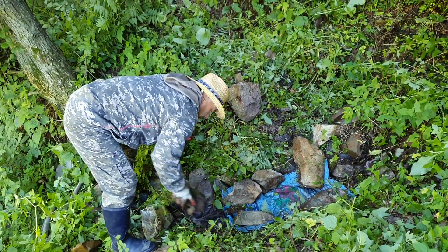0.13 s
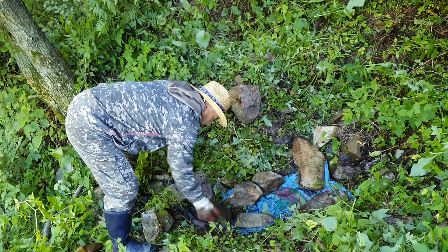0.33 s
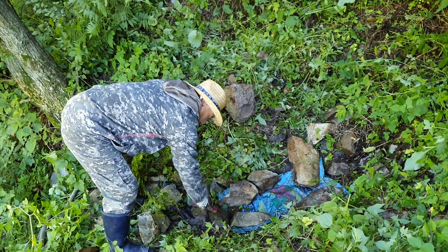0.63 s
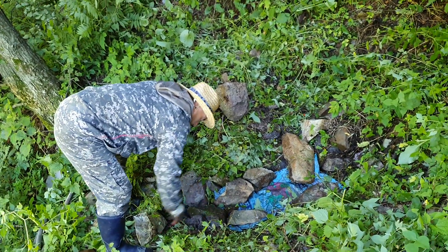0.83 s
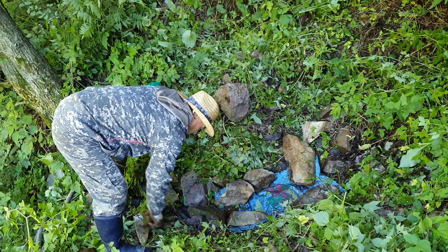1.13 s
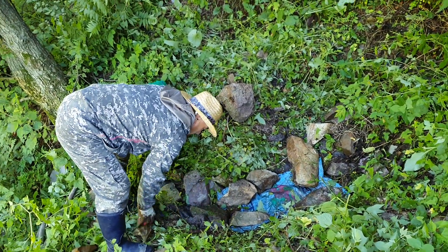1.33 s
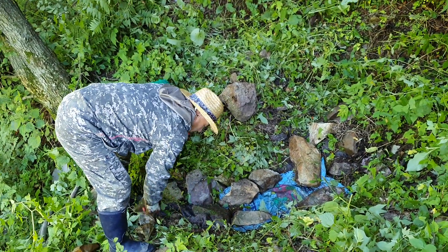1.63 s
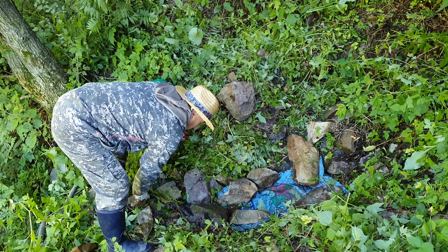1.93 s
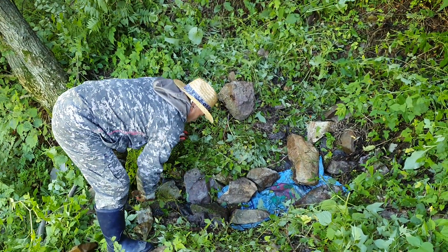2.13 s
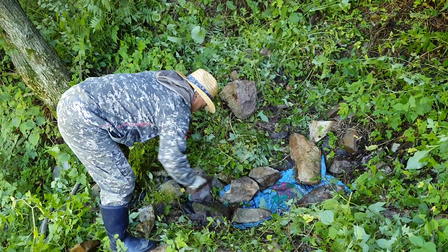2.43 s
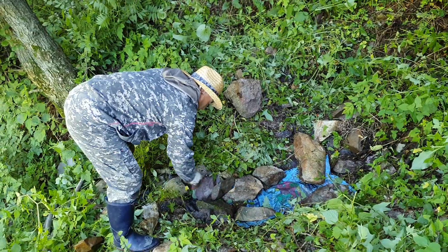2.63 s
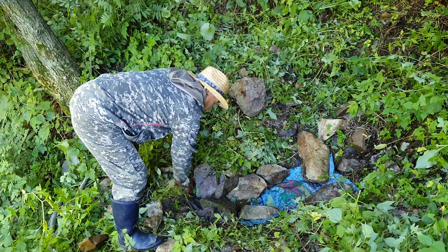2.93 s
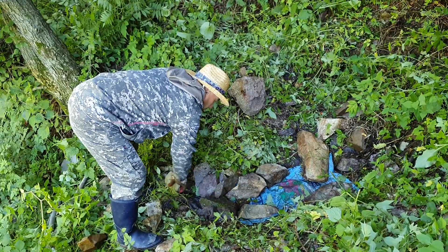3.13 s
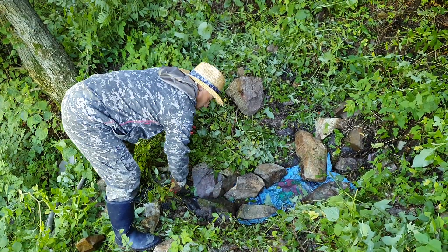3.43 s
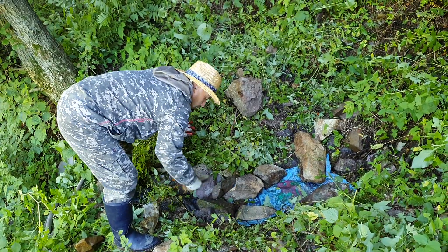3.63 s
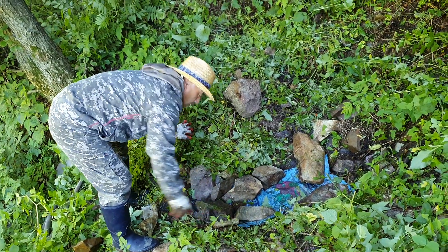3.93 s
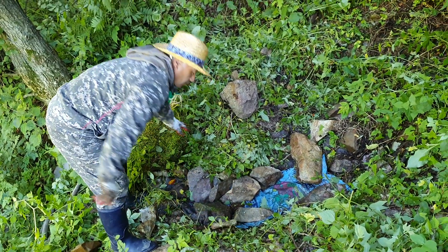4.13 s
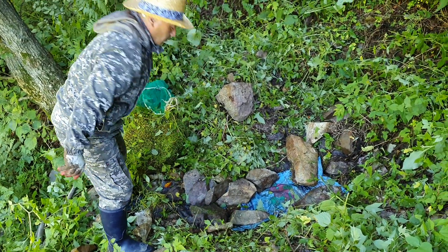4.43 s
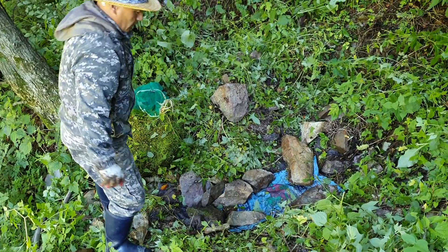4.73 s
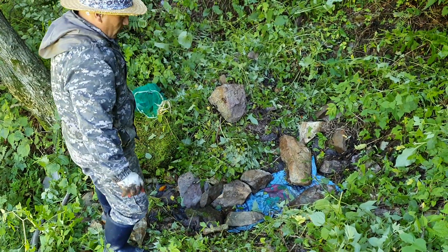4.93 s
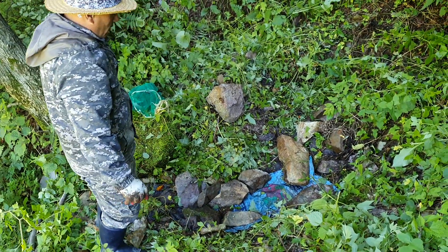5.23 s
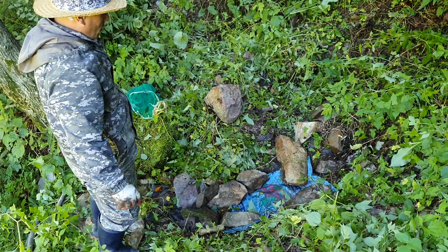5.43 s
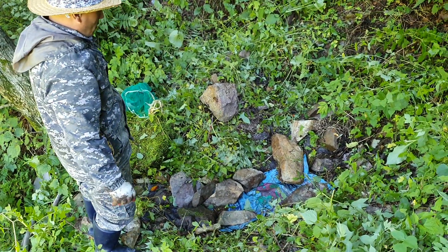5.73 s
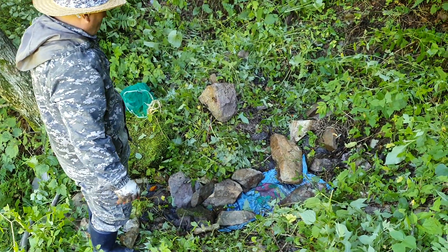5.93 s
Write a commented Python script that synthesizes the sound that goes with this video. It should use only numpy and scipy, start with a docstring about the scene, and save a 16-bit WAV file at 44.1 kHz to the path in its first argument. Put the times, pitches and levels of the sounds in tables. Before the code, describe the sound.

Someone lays stones by hand outdoors, heard from fairly close: first a short gritty scrape and knock, then light taps, one sharp, slightly distorted crack, and a duller double knock with a thud. The rest is soft rustling of leaves and clothes with a few faint bumps. Thin, high bird chirps and a faint distant engine sit in a low hush throughout.

```python
"""Over an outdoor hush, a stone grinds into place in a low ring being laid by hand on an overgrown slope.
Another cracks hard against its neighbour and overloads the right channel; a third lands with a double
knock. Contacts click and ring, crushed grit crackles, the soil thuds, and the slope echoes briefly.
Leaves and clothing rustle, small birds chirp in the trees, and a far engine hums."""
import sys
import numpy as np
from scipy import signal
from scipy.fft import rfft, irfft, next_fast_len
from scipy.io import wavfile

SR = 44100
rng = np.random.default_rng(int(sys.argv[2]) if len(sys.argv) > 2 else 0)


def transcribe(u):
    """Save the signal u as a 16-bit wav file named by the first command-line argument.

    u: samples, shape (n,) or (channels, n), limited to [-1, 1]; the rate is SR.
    q: integer samples, one column per channel.
    """
    v = np.clip(np.atleast_2d(u).T, -1, 1)
    q = np.round(v * 32767).astype(np.int16)
    wavfile.write(sys.argv[1], SR, q)


N = 268789
T = np.arange(N) / SR


def undb(db):
    """Decibels to gain."""
    return 10 ** (np.asarray(db) / 20)


def unit(x):
    """Scale to rms 1."""
    return x / np.sqrt(np.mean(x ** 2))


def colour(x, points):
    """Filter by a (Hz, dB) curve."""
    hz, db = np.transpose(points)
    size = next_fast_len(x.shape[-1], real=True)
    bins_hz = np.fft.rfftfreq(size, 1 / SR)
    gain = undb(np.interp(np.log(bins_hz + 1), np.log(hz), db))
    return irfft(rfft(x, size) * gain, size)[..., :x.shape[-1]]


def drift(per_s):
    """Random drift of rms 1, with per_s new values a second."""
    levels = rng.standard_normal(N // 10)
    return unit(np.interp(T * per_s, np.arange(len(levels)), levels))


def add(track, start_s, sound):
    """Mix a sound into the track."""
    i = max(int(start_s * SR), 0)
    track[i:i + len(sound)] += sound[:max(N - i, 0)]


def pan(x, left_db):
    """Place in stereo; left_db is left minus right."""
    return x * undb(np.array([[left_db], [-left_db]]) / 2)


def grains(per_s, spread_db):
    """A stream of tiny fractures of unequal size."""
    size = undb(spread_db * np.minimum(rng.exponential(size=N), 4))
    return unit((rng.random(N) < per_s / SR) * rng.choice([-1, 1], N) * size)


def scatter(x, delay_s, t60_s, points):
    """Diffuse echo from ground and plants: late onset, then decay, unrelated left and right."""
    t = T[:SR]
    envelope = (1 - np.exp(-(t / delay_s) ** 6)) * undb(-60 * t / t60_s)
    echo = colour(rng.standard_normal((2, SR)), points) * envelope / np.sqrt(np.sum(envelope ** 2))
    return signal.fftconvolve(x[None], echo, axes=1)[:, :N]


# Each row: frequency in Hz, relative noise density in dB.
HUSH_SPECTRUM = [(15, -40), (25, -9), (69, -7), (82, -10), (99, -21.5), (240, -10), (359, -15), (552, -13),
                 (762, -21.5), (1450, -25), (1950, -22), (2850, -29.5), (6050, -34.5), (8810, -50.5),
                 (15500, -47.5)]
# Each row: frequency in Hz, left minus right in dB.
HUSH_BALANCE = [(60, -2), (200, -1.5), (700, -.5), (2400, 3.5), (4400, 0.5), (8000, 14), (15000, -9)]
# Each row: time in seconds, level in dB. The rumble follows 0.7 of the swing about the mean.
RUMBLE_CONTOUR = [(0.0, -62), (0.25, -61), (4.14, -61.5), (5.22, -54), (5.44, -60), (6.09, -60)]

def hush():
    """Distant outdoor noise, narrow in the bass, wide in the treble; its rumble swells and ebbs."""
    mid, side = colour(rng.standard_normal((2, N)), HUSH_SPECTRUM)
    side = colour(side, [(60, -15), (200, -10), (380, -7), (700, 0.5),
                         (1300, 4.5), (2400, -2.5), (8000, 4.5)])
    left = colour(mid + side, [(hz, db / 2) for hz, db in HUSH_BALANCE])
    right = colour(mid - side, [(hz, -db / 2) for hz, db in HUSH_BALANCE])
    air = np.array([left, right]) / np.std(mid)
    rumble = colour(air, [(700, -10), (2500, -22)])
    contour_db = np.interp(T, *np.transpose(RUMBLE_CONTOUR))
    swell_db = 0.7 * (contour_db - contour_db.mean()) + 0.75 * drift(per_s=7.5)
    return undb(-57) * (air - rumble + rumble * undb(swell_db))


# Each row: peak time in seconds, half width in seconds, rise in dB.
ENGINE_SWELLS = [(2.42, 0.43, 12), (4.45, .25, 7.5), (5.3, .17, 9)]

def engine():
    """A far engine: one low, wavering tone that swells and recedes."""
    hz = 68.1 + 2.59 * drift(per_s=22)
    swell_db = sum(rise_db * np.exp(-((T - peak_s) / width_s) ** 2 / 2)
                   for peak_s, width_s, rise_db in ENGINE_SWELLS)
    rms_db = -65.5 + swell_db + 2.5 * drift(per_s=12)
    tone = np.sqrt(2) * np.sin(2 * np.pi * np.cumsum(hz) / SR)
    return pan(tone * undb(rms_db), left_db=-2)


def whistle(length_s, top_hz, fall_hz, sag, overtone_db, quaver_hz):
    """A bird's note swells as its pitch sags and lifts; a random quaver, quaver_hz deep, roughens it."""
    progress = np.linspace(0, 1, int(length_s * SR))
    quaver = np.interp(progress, np.linspace(0, 1, 60), rng.standard_normal(60))
    hz = top_hz - fall_hz * np.interp(progress, *np.transpose(sag)) + quaver_hz * quaver
    phase = 2 * np.pi * np.cumsum(hz) / SR
    return np.sin(np.pi * progress ** 1.41) * (np.sin(phase) + undb(overtone_db) * np.sin(2 * phase))


# Pitch contours. Each row: share of the note, share of the fall.
CHIRP_SAG = [(0, 0.51), (.25, .01), (.45, 0), (.8, .95), (1, 0.13)]
SLUR_SAG = [(0, 0.059), (.25, .25), (.55, .8), (.75, 1), (1, .6)]
# Each row: start in seconds, top pitch in Hz, fall in Hz, relative level in dB.
CHIRPS = [ (.429, 5190, 80, -49.5), (.665, 5035, 61, -57), (1.448, 5080, 221, -53),
          (1.925, 4990, 88, -53.5), (2.228, 5200, 111, -48.5), (2.970, 5160, 128, -52),
          (3.440, 5030, 101, -56.5), (3.665, 5170, 151, -50.5), (4.441, 5186, 123, -51.5),
          (4.975, 5110, 99, -60), (5.168, 5160, 139, -50.5), (5.914, 5170, 220, -49.5), ]
# A farther bird. Each row: start in seconds, top pitch in Hz, relative level in dB, overtone in dB.
SLURS = [(2.135, 4120, -64, -7.5), (3.459, 4490, -74, -17)]
# Each row: start in seconds, top pitch in Hz, relative level in dB.
HOARSE_CALLS = [(1.05, 6220, -61), (3.62, 5750, -67), (4.317, 5550, -70), (5.855, 5600, -60)]

def birds():
    """Birds off to the left, each kind repeating one note, prolonged by the trees."""
    song = np.zeros(N)
    for start_s, top_hz, fall_hz, db in CHIRPS:
        note = whistle(0.1026, top_hz, fall_hz, CHIRP_SAG, overtone_db=-52, quaver_hz=18.6)
        add(song, start_s, undb(db) * note)
    for start_s, top_hz, db, overtone_db in SLURS:
        note = whistle(0.28, top_hz, fall_hz=260, sag=SLUR_SAG, overtone_db=overtone_db, quaver_hz=22)
        add(song, start_s, undb(db) * note)
    for start_s, top_hz, db in HOARSE_CALLS:
        note = whistle(0.062, top_hz, fall_hz=260, sag=CHIRP_SAG, overtone_db=-40, quaver_hz=268)
        add(song, start_s, undb(db) * note)
    song *= undb(2.5 * drift(per_s=60) - 3)
    trees = scatter(song, delay_s=0.0048, t60_s=0.64, points=[(3000, -1.2), (9000, -1.27)])
    return pan(song, left_db=13) + undb(2) * pan(trees, left_db=3.5)


# Leaves stirred by the worker or shaken by the hard crack.
# Each row: peak time in seconds, rise and fall time constant in seconds, relative level in dB.
LEAF_RUSTLES = [ (1.165, 0.034, -61), (1.33, 0.11, -59), (1.755, 0.077, -61), (2.305, 0.017, -56),
                (2.606, 0.02, -49.5), (3.48, 0.041, -59.5), (5.225, 0.089, -59.5), (5.38, .03, -58.5),
                (5.91, 0.035, -66.5), ]

def brushes(lag_s=0.012, width_s=0.065, shake_db=-24):
    """The rows of LEAF_RUSTLES, plus one for each sliding stone that brushes the leaves."""
    return LEAF_RUSTLES + [(start_s + lag_s, width_s, db + shake_db) for start_s, _, _, db, _ in SCRAPES]


def leaf_ticks():
    """Four leaves flick free in each brush, each with a tiny high ring of its own."""
    out, t = np.zeros(N), T[:SR // 50]
    for peak_s, width_s, db in brushes():
        for offset, pitch, force in rng.standard_normal((4, 3)):
            hz = np.clip(10500 * np.exp(0.3 * pitch), 4000, 15000)
            tick = np.exp(-t / 0.0007) * np.sin(2 * np.pi * hz * t)
            add(out, peak_s + offset * width_s, undb(db + 2 + 2 * force) * tick)
    return out


# Each row: frequency in Hz, gain in dB.
LEAF_SPECTRUM = [(800, -9), (2000, 6.5), (4000, -27), (7000, 5), (9000, -7.5), (12500, 1.5), (16000, -5)]
CLOTH_SPECTRUM = [(200, -8.5), (600, -9), (2000, 0.5), (3500, 2), (8000, -11.5)]

def rustle():
    """Leaves crackle and cloth rasps with each brush; the leaves stir faintly in between."""
    swell = np.sqrt(sum((undb(db) * np.exp(-abs(T - peak_s) / width_s)) ** 2
                        for peak_s, width_s, db in brushes()))
    crackle = np.array([grains(per_s=3000, spread_db=0.4) for _ in range(2)])
    leaves = unit(colour(crackle, LEAF_SPECTRUM)) * (swell + undb(-66.5))
    cloth = unit(colour(crackle, CLOTH_SPECTRUM)) * swell * undb(3)
    flicker = undb(1.9 * drift(per_s=90) - 4)
    return pan((leaves + cloth) * flicker + leaf_ticks(), left_db=0.9)


# Each row: start in seconds, relative level in dB, resting pitch in Hz.
THUDS = [ (.377, -30, 122), (1.267, -38, 154), (1.356, -44, 145), (1.404, -43.5, 150), (2.290, -40, 254),
         (2.474, -38.5, 244), (3.864, -28.5, 149), (3.881, -23.5, 62.4), (5.28, -40, 253),
         (5.386, -45, 124.5), ]

def thuds(attack_s=0.00077, yield_s=0.0055, octave_up_db=-31.5):
    """A stone bounces on springy soil; a hard landing stiffens it, and the pitch sinks as it yields."""
    out, t = np.zeros(N), T[:SR // 4]
    for start_s, db, rest_hz in THUDS:
        hz = rest_hz * (1 + undb(db - octave_up_db) * np.exp(-t / yield_s))
        t60_s = 0.091 * np.sqrt(100 / rest_hz)
        envelope = (1 - np.exp(-t / attack_s)) * undb(db - 60 * t / t60_s)
        add(out, start_s, envelope * np.sin(2 * np.pi * np.cumsum(hz) / SR))
    return colour(out, [(25, -18), (65, -3)])  # trim the deepest bass


# Per stone. Each row: frequency in Hz, level in dB, T60 in seconds.
STONE_MODES = { "rough": [(440, -32, 0.01), (850, -2.5, 0.035), (980, -7, 0.039), (1360, 6, 0.012),
               (1615, 5.5, 0.03), (1740, 1.5, 0.028), (1830, -9, 0.018), (2290, -2, 0.031),
               (2640, -4, 0.031)], "hard": [(646, -12, 0.021), (1020, -15.5, 0.023), (1152, -1.5, 0.028),
               (1644, -5.5, 0.027), (1940, 0, 0.022), (2660, 1.5, 0.011), (3080, 5.5, 0.0054),
               (3020, -22, 0.22), (3340, -18, 0.13)], "heavy": [(238, -11, 0.017), (362, -2.5, 0.02),
               (557, 3.5, 0.045), (686, -7, 0.039), (915, -0.5, 0.025), (1120, 12.5, 0.014),
               (1470, 3.5, 0.02), (2740, 5.5, 0.012), (5620, 0.5, 0.015)], "small": [(587, -1.5, 0.028),
               (797, -1, 0.029), (893, 0, 0.029), (1130, 0, 0.033)], }

def stone_ring(stone):
    """Impulse response of a stone's well damped modes."""
    t = T[:SR // 5]
    return sum(undb(db - 60 * t / t60_s) * np.cos(2 * np.pi * hz * t)
               for hz, db, t60_s in STONE_MODES[stone])


# Each row: start in seconds, stone, length in seconds, relative level in dB, crackle over ring in dB.
SCRAPES = [ (.333, "rough", 0.043, -34.5, -5.5), (1.284, "small", .05, -57.5, -20),
           (1.786, "small", 0.053, -60, -16), (2.301, "rough", 0.013, -54, -14),
           (2.5846, "hard", 0.015, -41.5, 7.5), (3.8605, "heavy", 0.028, -36.5, -6), ]

def scrapes():
    """Grit crushed between sliding stones crackles and keeps the stone ringing."""
    out, grit = np.zeros(N), grains(per_s=7000, spread_db=2.5)
    for start_s, stone, length_s, db, crackle_db in SCRAPES:
        crackle = unit(grit[int(start_s * SR):int((start_s + length_s) * SR)])
        ring = signal.fftconvolve(crackle, stone_ring(stone))
        ring *= np.sqrt(len(crackle) / np.sum(ring ** 2))  # same energy as the crackle
        add(out, start_s, undb(db) * ring)
        add(out, start_s, undb(db + crackle_db) * crackle)
    return colour(out, [(200, 7.5), (1500, -5.5), (4000, -1), (7000, -3),
                        (9500, -8.5), (12500, -4), (16000, -8.5)])


# Per stone: gain of the ring over the click in dB, at the reference contact time.
RING_DB = {"rough": -12.5, "hard": -6, "heavy": -5, "small": -14}
# Each row: time in seconds, stone, relative level in dB, contact time in milliseconds.
KNOCKS = [ (0.3457, "rough", -33, 0.054), (.3668, "rough", -24.5, 0.068), (0.3725, "small", -28, 0.35),
          (.4215, "small", -42, 0.31), (1.2589, "small", -31.5, 0.25), (1.4025, "small", -37.5, .19),
          (1.7935, "small", -42, 0.32), (2.5722, "hard", 2, 0.086), (2.6023, "hard", -23, 0.099),
          (2.6064, "small", -16, 0.18), (3.8651, "heavy", -25.5, 0.081), (3.8808, "heavy", -23, 0.034),
          (3.8820, "heavy", -27, 0.18), (5.3820, "small", -44.5, .19), (5.9560, "small", -42, 0.21), ]

def knocks(reference_ms=0.1):
    """Stone jolts stone: a one-cycle click and a brief ring; longer contact is duller and rings more."""
    out, lead = np.zeros(N), SR // 300
    t_ms = np.arange(-lead, lead) / SR * 1000
    for time_s, stone, db, contact_ms in KNOCKS:
        contact_phase = t_ms / contact_ms
        click = np.sin(contact_phase) * np.exp(-(contact_phase / 3.63) ** 2)
        force = np.exp(-contact_phase ** 2 / 2)
        force *= contact_ms / reference_ms / force.sum()
        ring = np.convolve(force, stone_ring(stone))
        add(out, time_s - lead / SR, undb(db) * click)
        add(out, time_s - lead / SR, undb(db + RING_DB[stone]) * ring)
    return out


# Echo off ground and slope. Each row: frequency in Hz, gain in dB.
ECHO_SPECTRUM = [(100, -11), (500, 5), (1200, 0), (3000, 8), (6000, 13.5), (15000, 10.5)]

def scene():
    """The stones, echoed by the ground and the slope behind, among birds, leaves and distant noise."""
    stones = knocks() + scrapes()
    ground = undb(-18.5) * scatter(stones, delay_s=0.0063, t60_s=0.13, points=ECHO_SPECTRUM)
    slope = undb(-33.5) * scatter(stones, delay_s=0.034, t60_s=0.27, points=ECHO_SPECTRUM)
    direct = pan(stones, left_db=1.05) + pan(thuds(), left_db=-2)
    return direct + ground + slope + birds() + rustle() + engine() + hush()


# Each row: frequency in Hz, gain in dB.
SNAP_SPECTRUM = [(1200, -27), (2200, 1), (4000, -7.5), (6000, 8.5), (8000, 2.5), (9700, 7), (12500, -8)]

def overload(x, ceiling):
    """Peaks near the ceiling fold back, adding odd overtones as a bright snap."""
    folded = x / (1 + (x / ceiling) ** 8)
    return x + colour(folded - x, SNAP_SPECTRUM)


def gain_control(x, threshold_db, release_s):
    """A loud sound turns the gain down, and it creeps back up."""
    pole = np.exp(-1 / (release_s * SR))
    power = signal.lfilter([1 - pole], [1, -pole], np.mean(x ** 2, axis=0))
    return x / np.sqrt(1 + power / undb(threshold_db) ** 2)


def record(dry):
    """The hardest crack overloads the right channel and ducks the gain; the top treble is cut off."""
    clipped = np.clip([dry[0], overload(dry[1], ceiling=0.81)], -1, 1)
    ducked = gain_control(clipped, threshold_db=-31.5, release_s=0.53)
    lowpass = signal.ellip(12, 0.2, 90, 15800, fs=SR, output="sos")
    return signal.sosfilt(lowpass, ducked)


dry = scene()
out = record(dry)
transcribe(out)
```